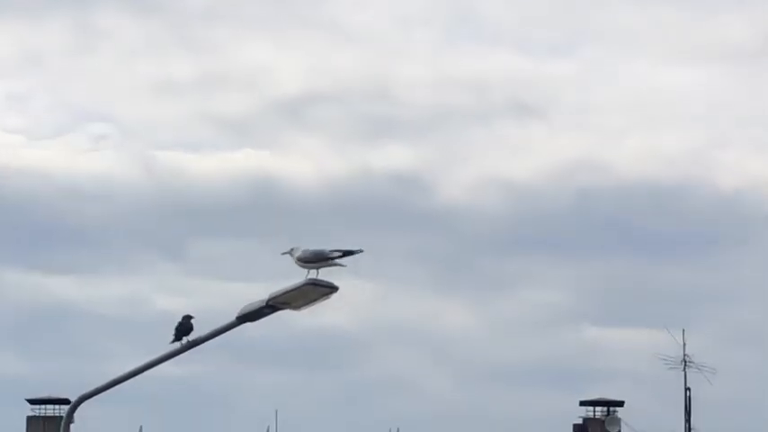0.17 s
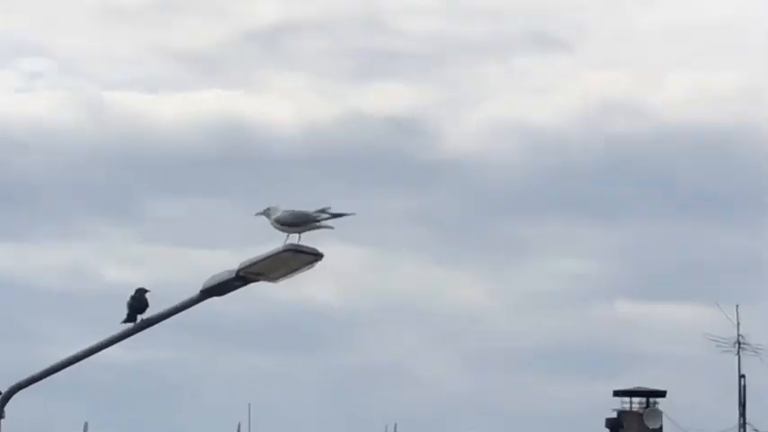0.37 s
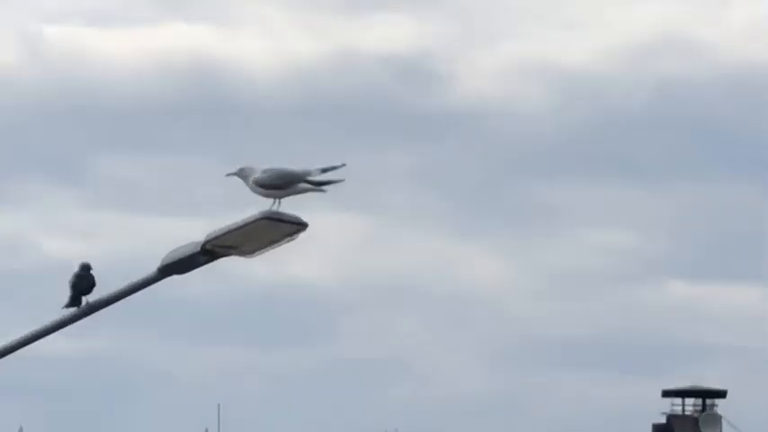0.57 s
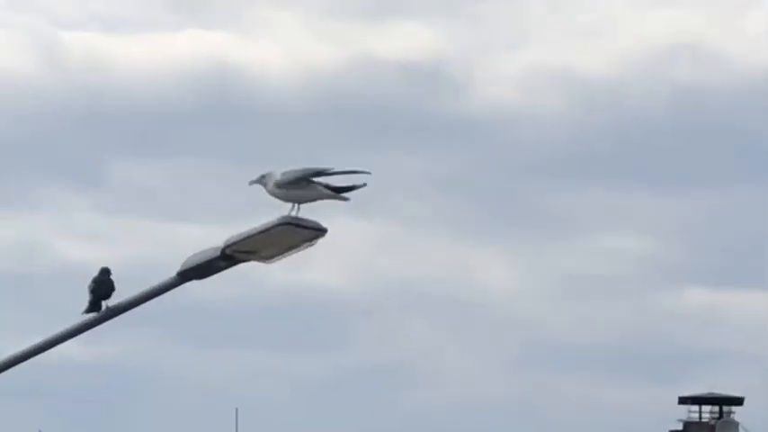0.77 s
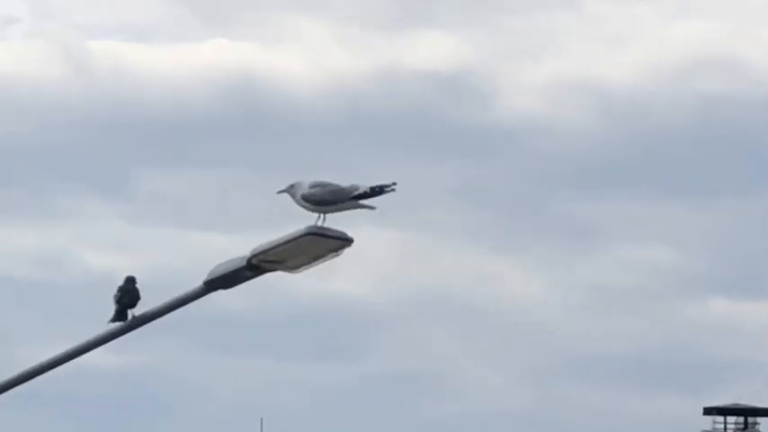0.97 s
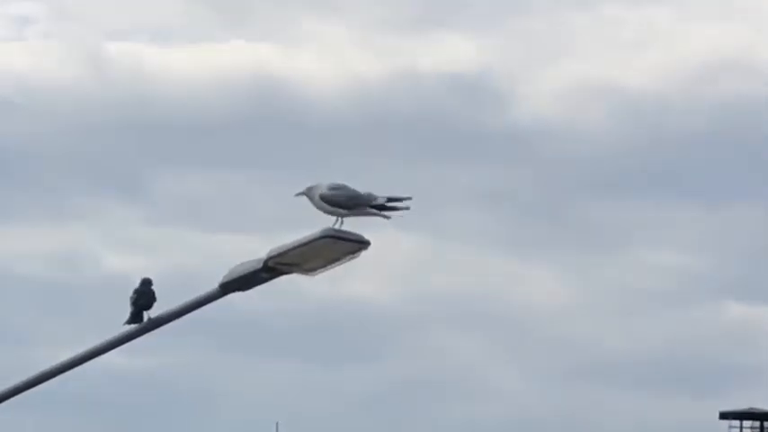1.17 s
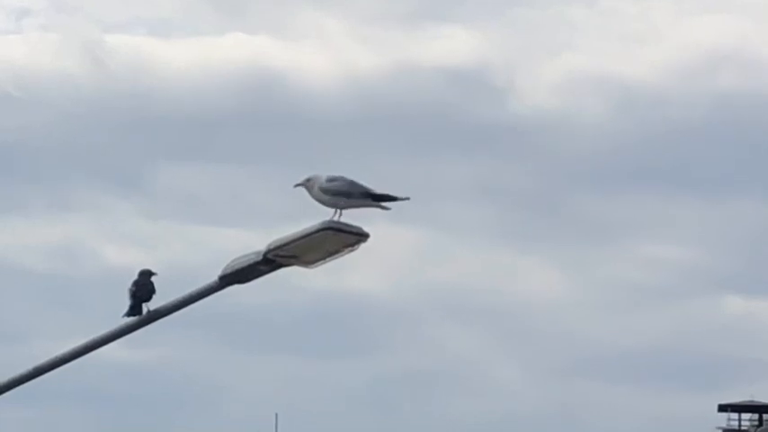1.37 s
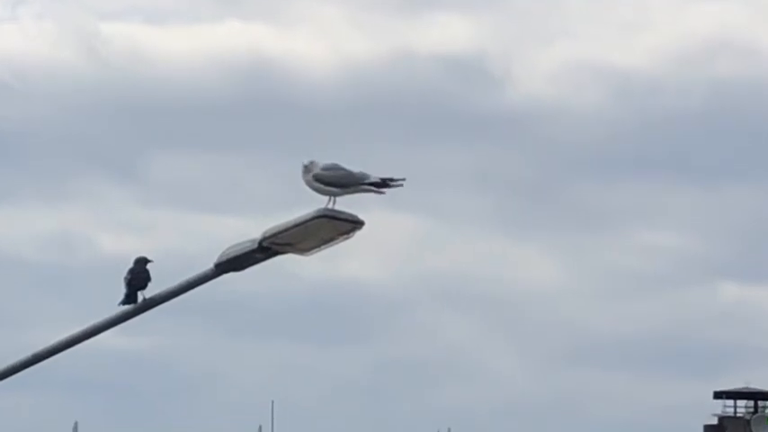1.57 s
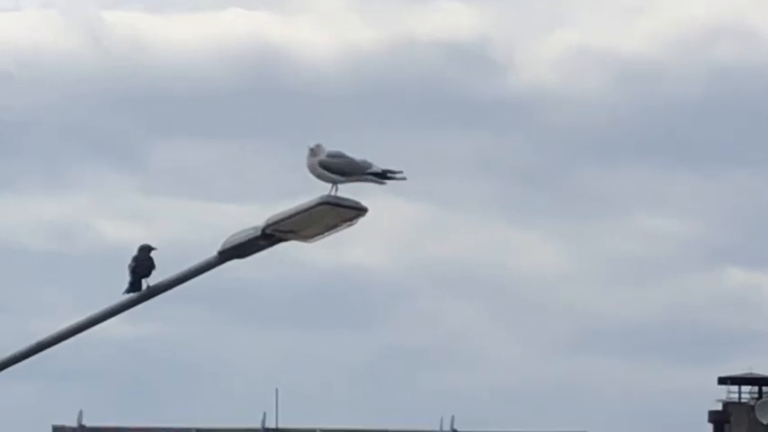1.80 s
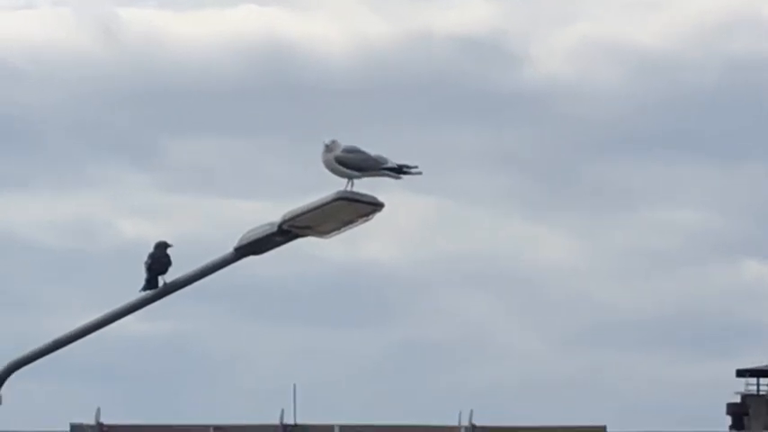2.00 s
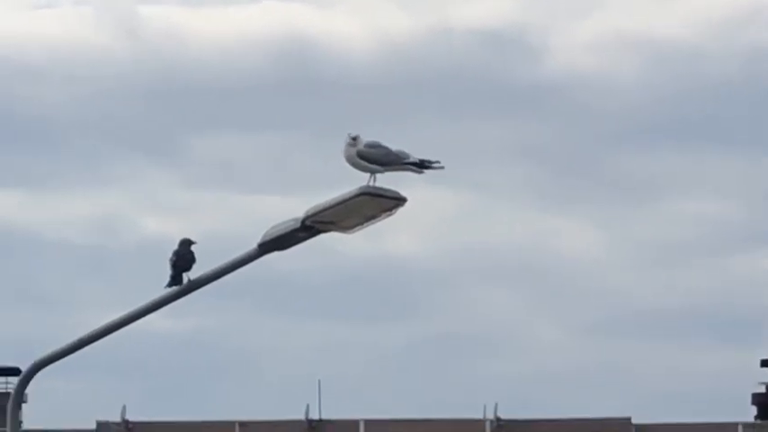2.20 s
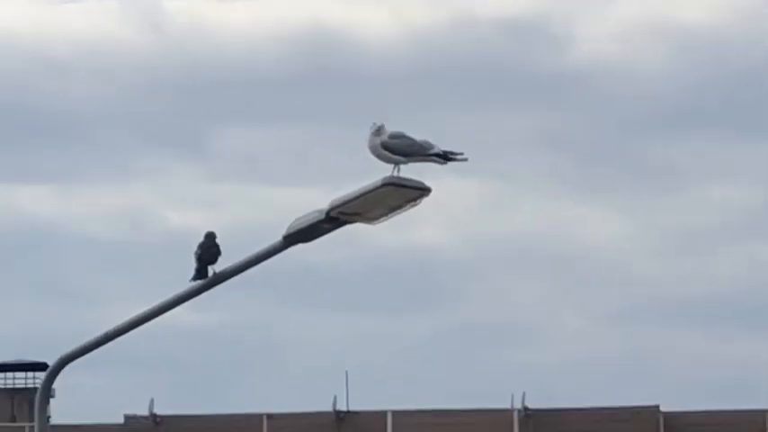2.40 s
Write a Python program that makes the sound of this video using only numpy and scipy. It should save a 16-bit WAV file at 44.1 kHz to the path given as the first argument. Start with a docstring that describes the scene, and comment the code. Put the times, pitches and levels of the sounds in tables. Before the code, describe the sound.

A gull gives five harsh cries over light wind buffeting the microphone.

```python
"""Gull over a windy street.

A gull on a street lamp gives five harsh cries: each creeps up in a low voice, breaks into a high
arch and falls away. House fronts throw the cries back; a small bird chatters far off. Light wind
buffets the microphone with rumble, pops and short crackles over the hum of the town."""
import sys
import numpy as np
from scipy import signal
from scipy.fft import rfft, irfft
from scipy.io import wavfile
from scipy.ndimage import uniform_filter1d

SR = 44100
rng = np.random.default_rng(int(sys.argv[2]) if len(sys.argv) > 2 else 0)


def waveform_to_disk(signal):
    """Save audio, clipped to [-1, 1], as 16-bit WAV at the path in sys.argv[1]."""
    frames = np.transpose(np.atleast_2d(signal))
    scaled = np.clip(frames, -1, 1) * 32767
    samples = np.round(scaled).astype(np.int16)
    wavfile.write(sys.argv[1], SR, samples)


N = 108045
TIME = np.arange(N) / SR
CUTOFF_HZ = 15800

# Town hum: f/Hz, relative density/dB
TOWN_SPECTRUM = [(20, -6.5), (60, 1.5), (130, -5.5), (260, -6), (450, -13), (800, -13), (1100, -18.5),
                 (1800, -29.5), (3300, -30), (5000, -36.5), (8000, -42), (14300, -43.5), (15100, -30.5),
                 (16000, -60)]
# Cries: voice break t/s, lead-in/s, break to crest/s, fall/s, crest f/Hz, f after break/Hz,
# share of pitch lost in the fall, base level/dB, tilt/(dB/octave)
GULL_CRIES = [(0.02, 0.075, 0.0068, 0.042, 1036, 997, 0.21, -46, -2.5),
              (.396, 0.064, 0.0065, .066, 1049, 1058, 0.27, -43.5, -2.5),
              (.793, .06, 0.021, 0.064, 1056, 1052, 0.29, -43, -2.5),
              (1.303, .042, .042, .062, 1141, 961, .28, -42.5, -1),
              (2.261, 0.048, .026, 0.057, 1056, 1038, .36, -40, -0.5)]
# Response of throat and open bill: f/Hz, gain/dB
THROAT_RESPONSE = [(500, -15.5), (750, 7), (1080, -5), (1450, 9), (2100, 3), (3200, 3.5), (4300, -1.5),
                   (5400, -4.5), (6500, -8.5), (8400, -14.5), (9800, -10), (12000, -21.5), (14000, -15),
                   (15800, -30.5)]
# House-front echoes: delay/s, level/dB
HOUSE_ECHOES = [(0.028, -13), (0.11, -25), (.195, -29), (.31, -27.5), (.5, -27), (.585, -27.5)]
# Gusts on the microphone: t/s, half width/s, level/dB
WIND_GUSTS = [(.025, 0.017, -35.5), (.145, 0.031, -31), (.29, 0.082, -34), (.37, 0.052, -38.5),
              (.48, 0.019, -34.5), (.535, 0.033, -37.5), (.6, 0.031, -38), (.675, .012, -33),
              (.855, 0.037, -36), (.96, 0.086, -46), (1.275, .012, -36), (1.405, 0.024, -32.5),
              (1.49, 0.039, -40.5), (1.62, 0.083, -38.5), (1.735, 0.0086, -35.5), (2.183, 0.035, -31),
              (2.31, 0.035, -39), (2.41, 0.1, -46.5)]
# Eddy rumble: f/Hz, relative density/dB
RUMBLE_SPECTRUM = [(20, -57), (40, -9), (65, 7.5), (100, -0.5), (150, -3), (220, -13), (400, -27.5),
                   (900, -33), (2000, -65.5), (6000, -69.5)]
# Swells of airy hiss: t/s, half width/s, level/dB
HISS_SWELLS = [(.18, 0.45, -61.5), (.515, 0.077, -49.5), (1.48, 0.21, -54.5)]
# Airy hiss: f/Hz, relative density/dB
HISS_SPECTRUM = [(200, -26), (700, 3), (1500, -3), (3400, -8.5), (5000, -24.5), (8000, -30), (12500, -29),
                 (16000, -28)]
# Wind crackles: t/s, half width/s, level/dB, nominal f/Hz
WIND_CRACKLES = [(0.131, 0.0043, -57, 600), (0.323, 0.0051, -42, 1500), (0.329, 0.0066, -36.5, 700),
                 (0.531, 0.0034, -42.5, 570), (0.699, 0.0012, -54.5, 1380), (1.05, 0.0023, -46, 880),
                 (1.542, 0.0024, -37.5, 1160), (1.726, 0.0068, -48, 870), (1.897, 0.0017, -49, 870),
                 (2.077, 0.0019, -44.5, 776), (2.1, 0.0043, -44, 596), (2.123, 0.0019, -42, 666),
                 (2.179, 0.0032, -46, 566)]
# Wind pops: t/s, snap level/dB, snap f/Hz, thump level/dB
WIND_POPS = [(0.2113, -26, 900, -60), (.214, -22.5, 367, -8), (0.2876, -37.5, 600, -49.5),
             (.581, -31.5, 530, -50), (.616, -30.5, 920, -52), (1.111, -42.5, 600, -41),
             (1.1287, -31.5, 520, -29.5), (1.259, -33, 417, -73), (1.7433, -26, 423, -48)]
# Faint ticks: t/s, level/dB
FAINT_TICKS = [(.212, -60.5), (1.042, -60.5), (1.13, -62.5), (1.808, -60.5), (2.003, -72.5), (2.094, -60.5),
               (2.149, -59.5)]
# Small bird's chirps: t/s, level/dB
BIRD_CHIRPS = [(.735, -70), (1.428, -62), (1.51, -62), (1.59, -64), (1.672, -64), (1.749, -63.5),
               (1.853, -66.5), (1.93, -72), (2.02, -66.5)]


def from_db(db):
    """Decibels to gain."""
    return 10 ** (np.asarray(db) / 20)


def unit_rms(x):
    """Scale to unit power."""
    return x / np.sqrt(np.mean(x ** 2) + 1e-20)


def db_at(spectrum, hz):
    """Interpolate a spectrum over log frequency."""
    points_hz, db = np.transpose(spectrum)
    return np.interp(np.log(hz + 1e-9), np.log(points_hz), db)


def noise(spectrum):
    """Coloured noise, unit RMS."""
    gain = from_db(db_at(spectrum, np.fft.rfftfreq(N, 1 / SR)))
    return unit_rms(irfft(rfft(rng.standard_normal(N)) * gain, N))


def filtered(x, hz, kind, order=2):
    """Butterworth filter."""
    return signal.sosfilt(signal.butter(order, hz, kind, fs=SR, output="sos"), x + 1e-18)


def drift(hz):
    """Low-passed random wander, unit RMS."""
    return unit_rms(filtered(rng.standard_normal(N), hz, "low"))


def bump(at_s, half_s):
    """Gaussian envelope, 1/e at half_s from its peak."""
    return np.exp(-((TIME - at_s) / half_s) ** 2)


def swells(rows):
    """Power sum of Gaussian envelopes."""
    return np.sqrt(sum((from_db(db) * bump(at_s, half_s)) ** 2 for at_s, half_s, db in rows))


def fade(u):
    """Smooth step from 0 to 1."""
    return np.sin(np.pi / 2 * np.clip(u, 0, 1)) ** 2


def town_hum(level_db=-53):
    """The town: steady, bass-heavy noise."""
    return from_db(level_db) * noise(TOWN_SPECTRUM)


def gull():
    """The syrinx rises in its low register, jumps to an arch and sags; the throat shapes it."""
    lead_start_hz, lead_top_hz = 453.2, 803.3
    attack_s, break_s, strain_s, release_s = 0.036, 0.003, 0.033, 0.028
    lead_db, strain_db, fall_db = -5, -2.5, -11.5
    lead_db_per_oct, fall_db_per_oct = -6, -5
    rasp_db, hoarse_rasp_db = -30, -12
    jitter, hoarse_jitter = 0.0037, 0.021
    out, wobble, breath = np.zeros(N), drift(hz=500), noise(THROAT_RESPONSE)
    flutters = [drift(hz=70) for _ in range(26)]  # one per harmonic
    for at_s, lead_s, climb_s, fall_s, crest_hz, entry_hz, sag, db, db_per_oct in GULL_CRIES:
        span = (TIME > at_s - lead_s) & (TIME < at_s + climb_s + fall_s + release_s / 2)
        t = TIME[span] - at_s
        register = 0.5 + 0.5 * np.tanh(t / break_s)  # 0 low, 1 high
        lead_left = np.maximum(-t / lead_s, 0)
        climb_left = np.clip(1 - t / climb_s, 0, 1)
        fall = np.maximum((t - climb_s) / fall_s, 0) ** 2.4
        hoarse = np.minimum(1 - register + 2 * fall, 1)  # clear only around the crest

        lead_hz = lead_top_hz + (lead_start_hz - lead_top_hz) * lead_left
        arch_hz = crest_hz * (1 - sag * fall) - (crest_hz - entry_hz) * climb_left ** 2
        hz = np.maximum(register * arch_hz + (1 - register) * lead_hz, 100)
        hz *= 1 + (jitter + hoarse_jitter * hoarse) * wobble[span]
        phase = 2 * np.pi * np.cumsum(hz) / SR

        rasp = from_db(rasp_db) + from_db(hoarse_rasp_db) * hoarse * (1 - lead_left)
        voice = rasp * breath[span] * (1 + np.cos(phase))  # breath pulses once per cycle
        tilt_db_per_oct = db_per_oct + fall_db_per_oct * fall + lead_db_per_oct * lead_left ** 2
        shimmer_db = 2.25 + 1.5 * hoarse
        for k, flutter in enumerate(flutters, 1):
            colour_db = db_at(THROAT_RESPONSE, k * hz) + tilt_db_per_oct * np.log2(max(k / 2, 1))
            gain = from_db(colour_db + shimmer_db * flutter[span])
            voice += gain * np.sin(k * phase) * (k * hz < CUTOFF_HZ)

        strain = np.exp(-(t / strain_s) ** 2)  # the voice weakens near the break
        register_db = (1.5 - register) * (lead_db + strain_db * strain)
        envelope = fade((t + lead_s) / attack_s) * fade((t[-1] - t) / release_s)
        out[span] += voice * envelope * from_db(db + register_db + fall_db * fall)
    return out


def street_echoes(x):
    """Ground reflection, scattered house-front echoes and a thin diffuse tail, all dulled."""
    ground_s, ground_db = 0.018, -10.5
    tail_db, t60_s, build_s, scatter_s = -20, 0.73, 0.06, 0.0027
    dull = filtered(x, hz=5200, kind="low")
    white = rng.standard_normal(N)
    tail = from_db(tail_db) * unit_rms(white * from_db(-60 * TIME / t60_s) * fade(TIME / build_s))
    fronts = sum(from_db(db) * unit_rms(white * bump(delay_s, scatter_s)) for delay_s, db in HOUSE_ECHOES)
    ground = from_db(ground_db) * np.interp(TIME - ground_s, TIME, dull, left=0)
    return ground + signal.fftconvolve(dull, tail + fronts)[:N] / np.sqrt(N)


def wind():
    """Eddies at the microphone swell with each gust; the air hisses now and then."""
    eddies = noise(RUMBLE_SPECTRUM)
    eddies /= np.sqrt(uniform_filter1d(eddies ** 2, size=1100) + 0.02)  # evened out over 25 ms
    return swells(WIND_GUSTS) * eddies + swells(HISS_SWELLS) * noise(HISS_SPECTRUM)


def crackles(white):
    """Wind on the microphone: short, dull bursts of band noise."""
    out = np.zeros(N)
    for at_s, half_s, db, hz in WIND_CRACKLES:
        band = unit_rms(filtered(white, [hz / 2.6, hz * 1.35], "band", order=3))
        out += from_db(db) * bump(at_s, half_s) * band
    return out


def pops():
    """Each wind pop sweeps from a snap down to a low thump in a few hundredths of a second."""
    sweep_cycles, snap_width_oct, snap_low_cut_hz = 1.484, 2, 139
    thump_hz, thump_width_oct = 87.4, 0.81
    out = np.zeros(N)
    for at_s, snap_db, snap_hz, thump_db in WIND_POPS:
        age_s = np.maximum(TIME - at_s, 1e-6)
        hz = sweep_cycles / age_s
        phase = 2 * np.pi * sweep_cycles * np.log(thump_hz / hz)
        snap = from_db(snap_db) * np.exp(-(np.log2(hz / snap_hz) / snap_width_oct) ** 2)
        snap /= (1 + (snap_low_cut_hz / hz) ** 2) ** 2
        thump = from_db(thump_db) * np.exp(-(np.log2(hz / thump_hz) / thump_width_oct) ** 2)
        out += (snap + thump) * np.sin(phase)
    return filtered(out, hz=4740, kind="low", order=4)


def ticks(white, band_hz=(1569, 9600), half_s=0.0017):
    """Tiny bright noise bursts close to the microphone."""
    bright = unit_rms(filtered(white, band_hz, "band", order=1))
    return bright * swells([(at_s, half_s, db) for at_s, db in FAINT_TICKS])


def small_bird():
    """Far, rough chirps that slide down."""
    centre_hz, fall_hz_per_s, half_s, jitter = 5100, 30000, 0.012, 0.09
    rough_hz = centre_hz * jitter * drift(hz=990)
    out = np.zeros(N)
    for at_s, db in BIRD_CHIRPS:
        hz = centre_hz + rough_hz - fall_hz_per_s * (TIME - at_s)
        out += from_db(db) * bump(at_s, half_s) * np.sin(2 * np.pi * np.cumsum(hz) / SR)
    return out


def scene():
    """Mono mix: birds, wind on the microphone, town."""
    cries = gull()
    birds = cries + street_echoes(cries) + small_bird()
    buffeting = wind() + pops()
    white = rng.standard_normal(N)
    return (birds + buffeting + crackles(white) + ticks(white) + town_hum())[None]


def record(dry):
    """The microphone sheds the deepest bass; the top is cut steeply."""
    dry = filtered(dry, hz=36, kind="high")
    return signal.sosfilt(signal.ellip(12, 0.1, 80, CUTOFF_HZ, fs=SR, output="sos"), dry)


dry = scene()
out = record(dry)
waveform_to_disk(out)
```